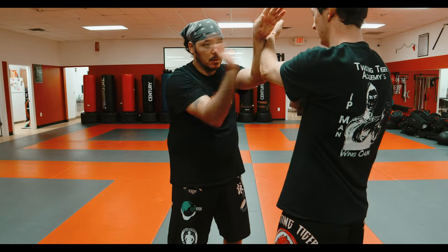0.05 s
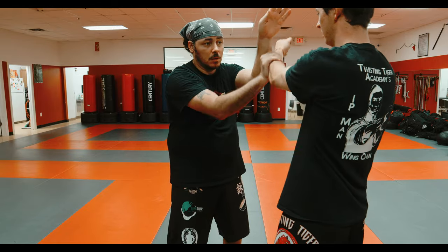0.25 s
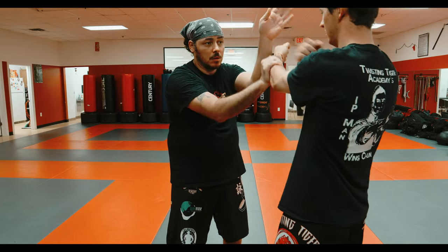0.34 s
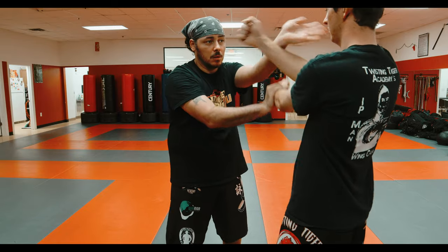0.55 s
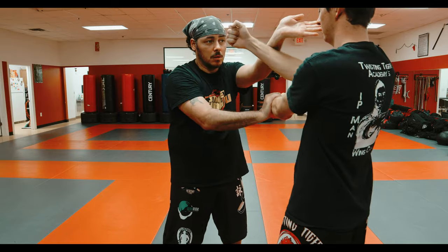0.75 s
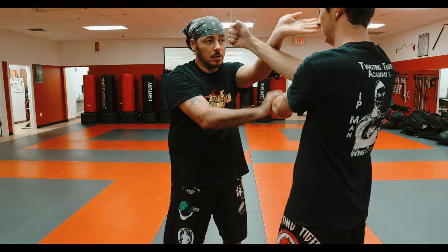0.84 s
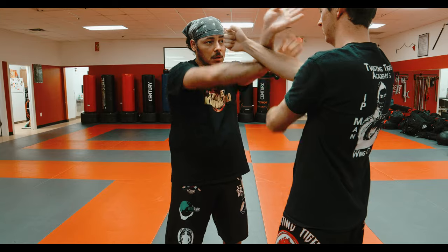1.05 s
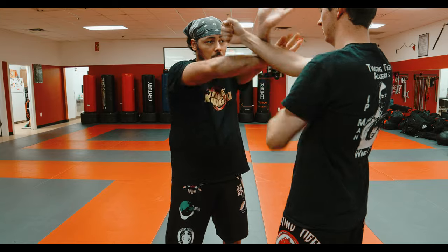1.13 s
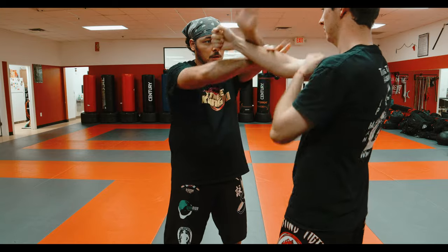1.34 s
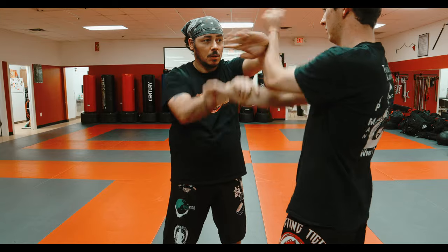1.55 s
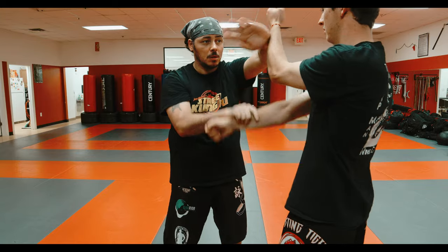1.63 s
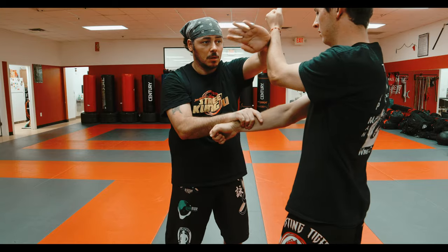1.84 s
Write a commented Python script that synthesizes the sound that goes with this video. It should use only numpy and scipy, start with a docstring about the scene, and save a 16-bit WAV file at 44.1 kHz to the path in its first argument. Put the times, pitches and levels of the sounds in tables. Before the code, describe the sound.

A sharp hand slap echoes in a gym, followed by faint arm taps and rubs.

```python
"""Hand traps in a gym

Two people drill on the mats. One sharp, close slap cracks skin on skin and rings the trapped air;
it overloads the microphone and hangs in the hall. Then forearms and sleeves rub past each other and
meet in a few light taps, over the low rumble of ventilation and of weight shifting on the mats."""
import sys
import numpy as np
from scipy import signal
from scipy.fft import rfft, irfft
from scipy.io import wavfile

SR = 44100
rng = np.random.default_rng(int(sys.argv[2]) if len(sys.argv) > 2 else 0)


def to_wav(s):
    """Save 16-bit WAV."""
    ch = np.atleast_2d(s).T  # columns
    pcm = np.round(np.clip(ch, -1, 1) * 32767)  # PCM
    wavfile.write(sys.argv[1], SR, pcm.astype(np.int16))


N = 83790
TIME = np.arange(N) / SR

# Fingers, palm and heel landing in turn: start_s, crack_db, pitch_hz, spray_db
HAND_LANDINGS = [(0.2009, -2.5, 1400, -12.5), (0.2024, -1, 2721, -13), (0.2039, -12, 700, -10),
                 (0.2060, 1, 3560, -16.5)]
# Air pockets between hand and arm: pitch_hz, level_db, t60_s
AIR_POCKETS = [(551, -22.5, .016), (1090, -27, .014), (1500, -20, .024), (1890, -22.5, .024),
               (2540, -15, .028), (3020, -13, .022), (3363, -5.5, .02), (3867, -18, 0.026),
               (4397, -17, 0.048), (5050, -20, 0.033), (5513, -23, 0.006), (8400, -26, .006),
               (10600, -5, 0.0029)]
# Colour of the squeezed-out air: freq_hz, density_db
SPRAY_COLOUR = [(200, -11.5), (450, -8), (850, -8.5), (1400, -1), (2200, -1.5), (3300, 4.5), (5000, 0),
                (6600, -13.5), (8500, -5), (11000, -10), (13000, -12.5), (16000, -20.5)]
def slap(palm_seal_s=0.2042, spray_t60_s=0.013):
    """Each part of the hand cracks and squirts air; the palm rings the pockets and the flesh thuds."""
    spray = noise(SPRAY_COLOUR)
    cracks = sum(from_db(crack_db) * crack(start, hz) + from_db(spray_db) * spray * decay(start, spray_t60_s)
                 for start, crack_db, hz, spray_db in HAND_LANDINGS)
    pockets = sum(from_db(db) * ring(palm_seal_s, hz, t60) * (-1) ** k
                  for k, (hz, db, t60) in enumerate(AIR_POCKETS))
    smack = filtered(cracks + pockets, 190, "high")  # a hand is too small to radiate much bass
    return smack + from_db(-20) * thud(start_s=0.2008)


def crack(start_s, hz, t60_cycles=1.3):
    """Skin meets skin: a soft-edged click, dead within a few cycles."""
    click = filtered(ring(start_s, hz, t60_cycles / hz), hz / 4, "high")
    return 2 * filtered(click, hz * 3.3, "low")


def thud(start_s, pitch_hz=204, t60_s=0.027):
    """The soft push of flesh."""
    return filtered(ring(start_s, pitch_hz, t60_s), pitch_hz / 2, "high")


# Arms meeting lightly: start_s, click_db, pitch_hz, crackle_db, crackle_t60_s, thud_db
ARM_TAPS = [(0.6310, -40, 3000, -55, 0.039, -68), (1.0570, -28.5, 1920, -53, 0.02, -53),
            (1.6446, -33.5, 1990, -29.5, 0.0097, -53), (1.6485, -41, 580, -43.5, 0.0084, -36)]
# Colour of the skin crackle: freq_hz, density_db
CRACKLE_COLOUR = [(300, 3), (1500, -3.5), (2700, 12), (6000, -6), (9000, 4.5), (12000, 4.5), (16000, 1)]
def taps():
    """Each touch layers a dead click, a crackle of skin and a soft thud."""
    crackle, out = noise(CRACKLE_COLOUR), np.zeros(N)
    for start, click_db, hz, crackle_db, t60, thud_db in ARM_TAPS:
        out += from_db(click_db) * crack(start, hz)
        out += from_db(crackle_db) * crackle * decay(start, t60)
        out += from_db(thud_db) * thud(start)
    return out


# Arms sliding past each other: start_s, rise_s, hold_s, fall_s, hiss_db, rasp_db
ARM_SLIDES = [(0.638, 0.0092, .008, 0.054, -58.5, -68), (0.671, 0.014, 0.0048, 0.021, -50.5, -65.5),
              (0.687, .015, 0.016, 0.052, -57.5, -76), (0.921, 0.012, 0.025, 0.041, -58.5, -63),
              (1.074, 0.023, 0.036, 0.081, -63, -63.5), (1.15, 0.045, 0.063, 0.088, -77, -73),
              (1.422, 0.07, 0.031, 0.26, -52.5, -56.5), (1.527, 0.034, .03, .05, -71, -55),
              (1.675, 0.017, 0.005, 0.037, -59.5, -63.5)]
# Bright hiss of skin: freq_hz, density_db
HISS_COLOUR = [(800, -14.5), (3000, -5), (4500, 1), (6200, -6.5), (8500, 0.5), (13000, -1), (16000, -3)]
# Darker rasp of sleeves: freq_hz, density_db
RASP_COLOUR = [(500, -22), (1200, -10.5), (2300, 0), (3100, -4), (4200, 1), (6000, -8.5), (9000, -17),
               (16000, -30.5)]
def slides(grains_per_s=900, grain_depth_db=1.5):
    """Grainy friction of skin and cloth: each stroke swells, holds, then drops 20 dB per fall time."""
    flicker = np.interp(TIME * grains_per_s, np.arange(N), rng.standard_normal(N))
    hiss, rasp = noise(HISS_COLOUR), noise(RASP_COLOUR)
    hiss_power, rasp_power = np.zeros(N), np.zeros(N)
    for start, rise, hold, fall, hiss_db, rasp_db in ARM_SLIDES:
        attack = np.clip((TIME - start) / rise, 0, 1)
        release = from_db(-20 * np.maximum(TIME - start - rise - hold, 0) / fall)
        hiss_power += (attack * release * from_db(hiss_db)) ** 2
        rasp_power += (attack * release * from_db(rasp_db)) ** 2
    friction = np.sqrt(hiss_power) * hiss + np.sqrt(rasp_power) * rasp
    return from_db(grain_depth_db * flicker) * friction


# Bounces off floor, ceiling, mirror and wall: delay_s, level_db
REFLECTIONS = [(.0056, -11.5), (0.0137, -15.5), (.0215, -23.5), (.0271, -20)]
def early_echoes(sound):
    """Nearby surfaces throw back dulled copies."""
    dull = filtered(sound, 8600, "low")
    return sum(from_db(db) * delayed(dull, delay) for delay, db in REFLECTIONS)


# The hall's reverb by band: freq_hz, level_db, t60_s
HALL_BANDS = [(120, -15.5, 0.42), (250, -13.5, .55), (501.2, -12.5, .52), (900, -13, 0.36),
              (1500, -10.5, 0.57), (2600, -11, 0.65), (3130, -13, 0.69), (4150, -12, .57), (5400, -9, .56),
              (7340, -7.5, 0.55), (10500, -14, .46), (15000, -15.5, 0.44)]
def hall_tail(sound, predelay_s=0.011, far_wall_s=0.054, far_wall_db=-5):
    """A diffuse wash: each band's energy lingers, and swells when the far walls answer."""
    edges_hz = np.geomspace(600, 17000, 28) - 500
    white, hz = rfft(rng.standard_normal(N)), np.fft.rfftfreq(N, 1 / SR)
    far_gain, out = from_db(far_wall_db) ** 2, np.zeros(N)
    for low, high in zip(edges_hz, edges_hz[1:]):
        centre = np.sqrt(low * high)
        t60 = at_hz(HALL_BANDS, centre, column=2)
        feedback = np.exp(-2 * np.log(1000) / (t60 * SR))
        band_power = filtered(sound, [low, high], "band") ** 2
        held = signal.lfilter([1 - feedback], [1, -feedback], band_power)
        energy = (delayed(held, predelay_s) + far_gain * delayed(held, far_wall_s)) / (1 + far_gain)
        wash = unit_rms(irfft(white * ((hz >= low) & (hz < high)), N))
        out += from_db(at_hz(HALL_BANDS, centre)) * np.sqrt(energy) * wash
    return out


# Weight shifts on the mats: peak_s, half_length_s, level_db
WEIGHT_SHIFTS = [(0.01, .12, -55), (1.763, 0.039, -54)]
# Boom of the matted floor: freq_hz, density_db
MAT_COLOUR = [(40, -25), (85, -11.5), (106, 0), (130, -8.5), (250, -22.5), (600, -40), (3000, -70)]
def mats():
    """The floor booms faintly as weight shifts."""
    swells = sum(from_db(db) * np.exp(-((TIME - peak) / half) ** 2) for peak, half, db in WEIGHT_SHIFTS)
    return noise(MAT_COLOUR) * swells


# Fan motor tones: pitch_hz, level_db
FAN_HUM = [(177.6, -69), (242.2, -72.5)]
# Rumble of the ventilation: freq_hz, density_db
VENT_COLOUR = [(25, -9), (40, 1.5), (65, 0), (110, 2), (180, -5.5), (250, -8), (330, -11.5), (700, -15.5),
               (1400, -21), (2500, -29.5), (4500, -29), (7000, -32), (10000, -31.5), (16000, -33.5)]
def ventilation(rumble_db=-57.5):
    """A steady bed of rumble with a faint motor hum."""
    hum = sum(from_db(db) * np.sqrt(2) * np.sin(2 * np.pi * (hz * TIME + rng.random()))
              for hz, db in FAN_HUM)
    return from_db(rumble_db) * noise(VENT_COLOUR) + hum


def from_db(db):
    return 10 ** (db / 20)


def unit_rms(x):
    return x / np.sqrt(np.mean(x ** 2) + 1e-20)


def at_hz(table, hz, column=1):
    """One column of a table, read on a log-frequency axis."""
    table = np.array(table)
    return np.interp(np.log(np.maximum(hz, 1)), np.log(table[:, 0]), table[:, column])


def noise(colour):
    """Noise of a given colour, at rms 1."""
    gain = from_db(at_hz(colour, np.fft.rfftfreq(N, 1 / SR)))
    return unit_rms(irfft(rfft(rng.standard_normal(N)) * gain, N))


def decay(start_s, t60_s):
    """An envelope that jumps to 1 and dies away."""
    return (TIME >= start_s) * np.exp(-np.log(1000) * np.maximum(TIME - start_s, 0) / t60_s)


def ring(start_s, hz, t60_s):
    """A struck resonance."""
    age = TIME - start_s
    return (age < 2 * t60_s) * decay(start_s, t60_s) * np.sin(2 * np.pi * hz * age)


def filtered(x, hz, kind):
    """Second-order Butterworth filter."""
    return signal.sosfilt(signal.butter(2, hz, kind, fs=SR, output="sos"), x + 1e-18)


def delayed(x, delay_s):
    return np.pad(x, (int(delay_s * SR), 0))[:N]


def scene():
    """Hands and arms up front, the hall around them, rumble underneath; mono."""
    hands = slap() + taps() + slides()
    room = early_echoes(hands) + hall_tail(hands)
    return (hands + room + ventilation() + mats())[None]


def record(dry, clip_level=0.95, cutoff_hz=16000):
    """The slap clips the microphone; a steep low-pass trims the very top."""
    low_pass = signal.ellip(10, 0.1, 70, cutoff_hz, fs=SR, output="sos")
    return signal.sosfilt(low_pass, np.clip(dry, -clip_level, clip_level))


dry = scene()
out = record(dry)
to_wav(out)
```